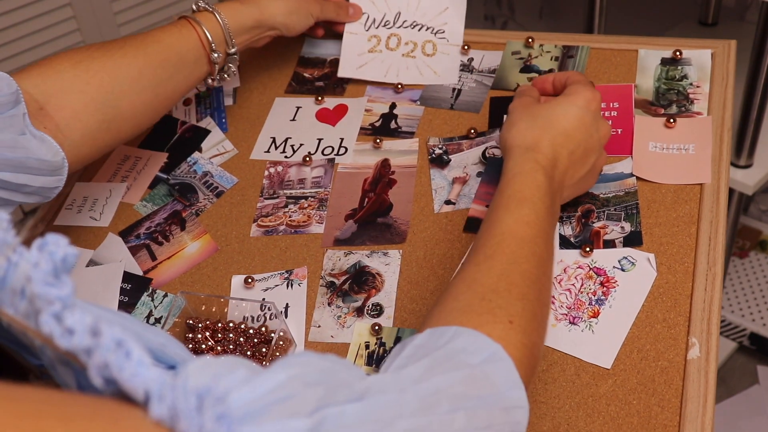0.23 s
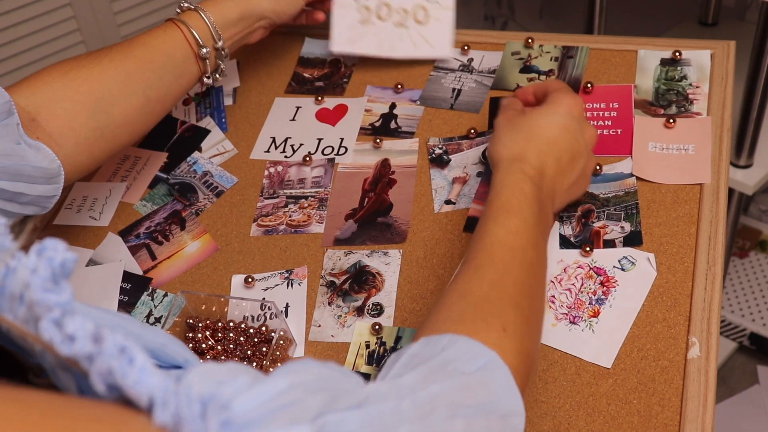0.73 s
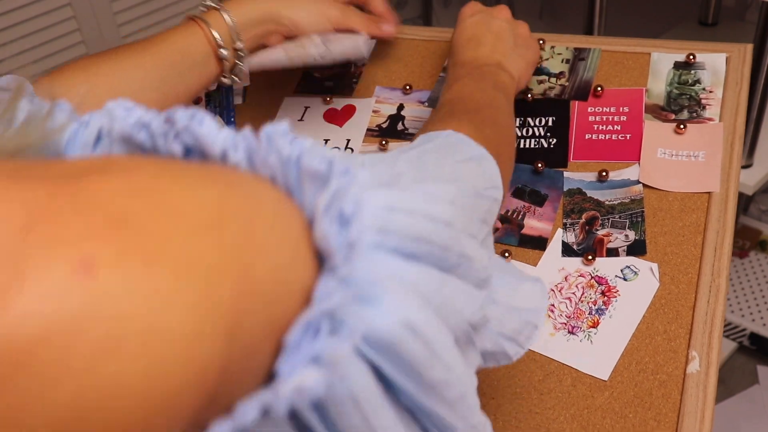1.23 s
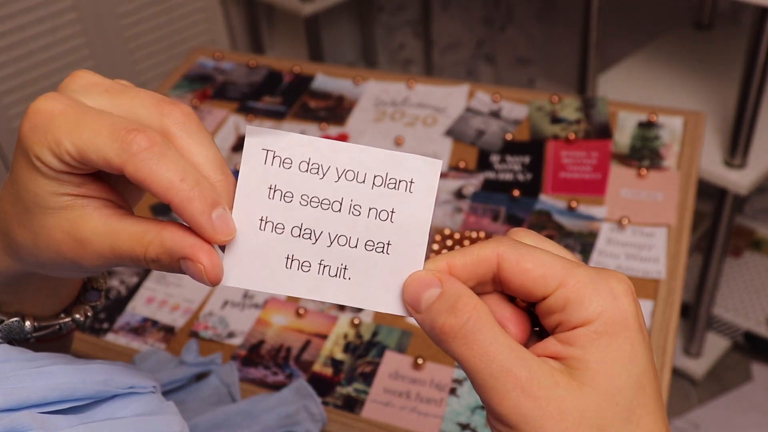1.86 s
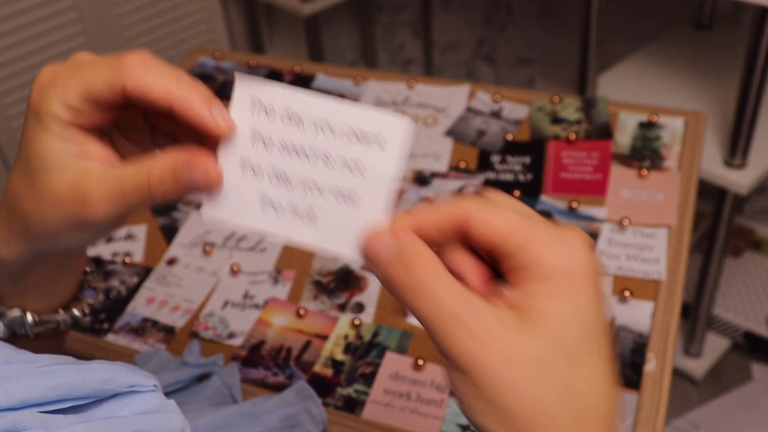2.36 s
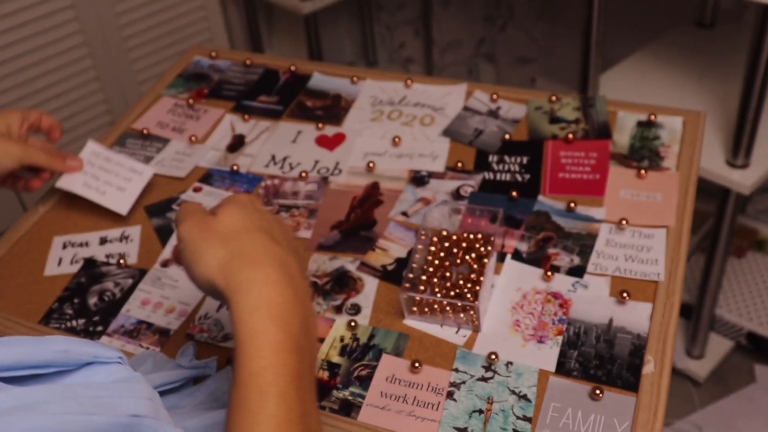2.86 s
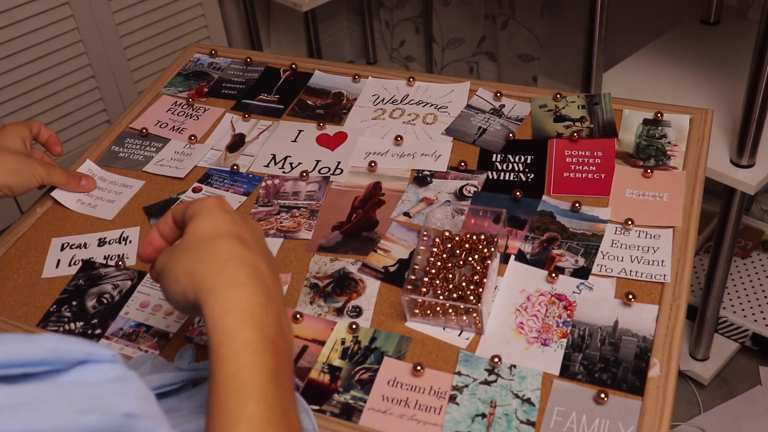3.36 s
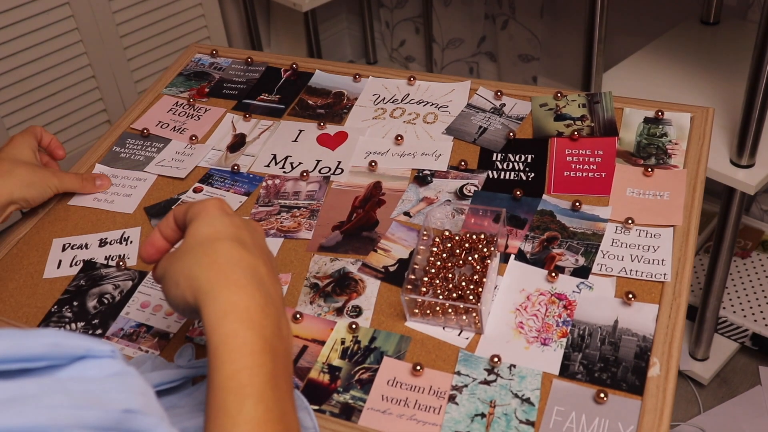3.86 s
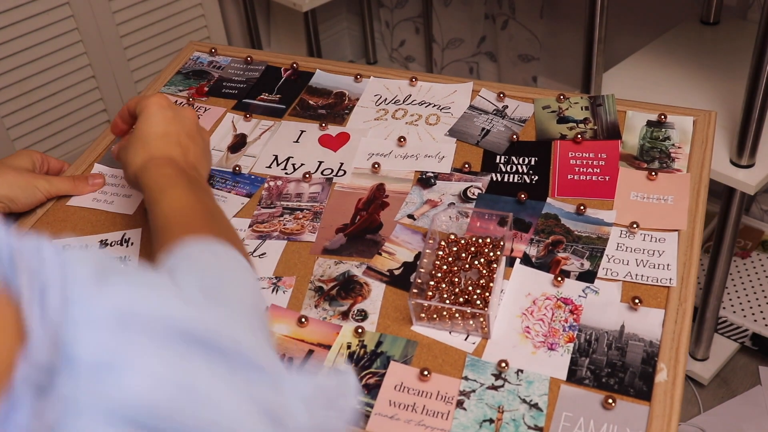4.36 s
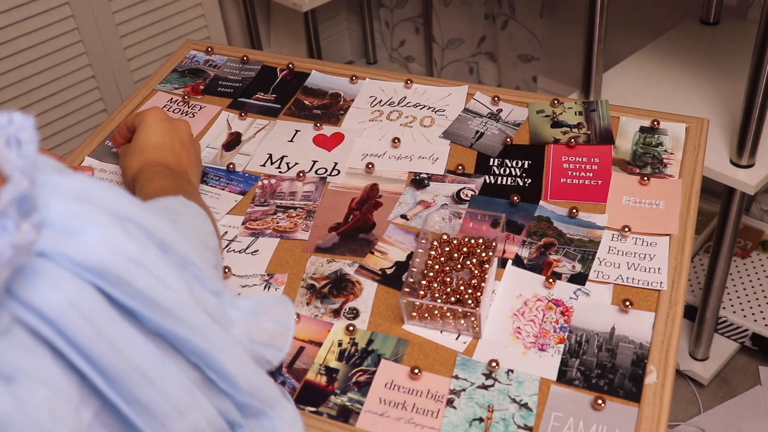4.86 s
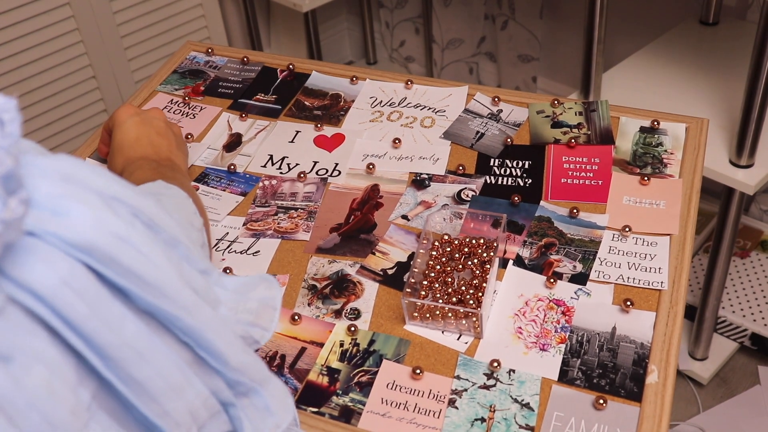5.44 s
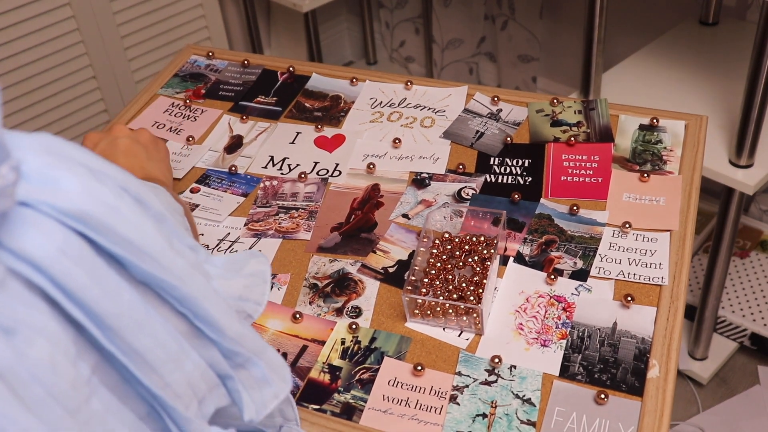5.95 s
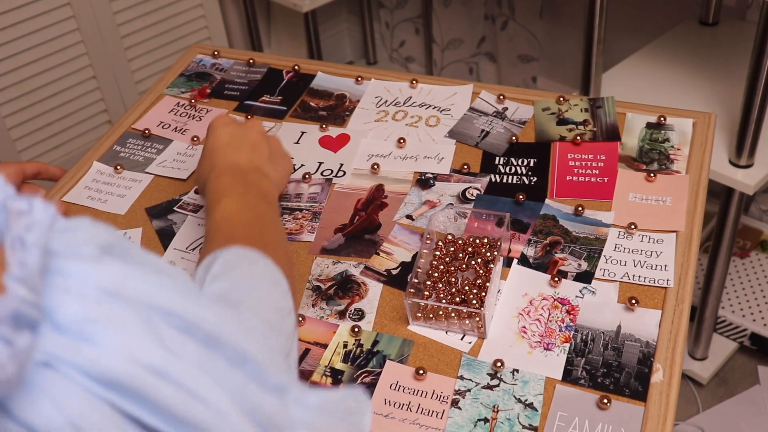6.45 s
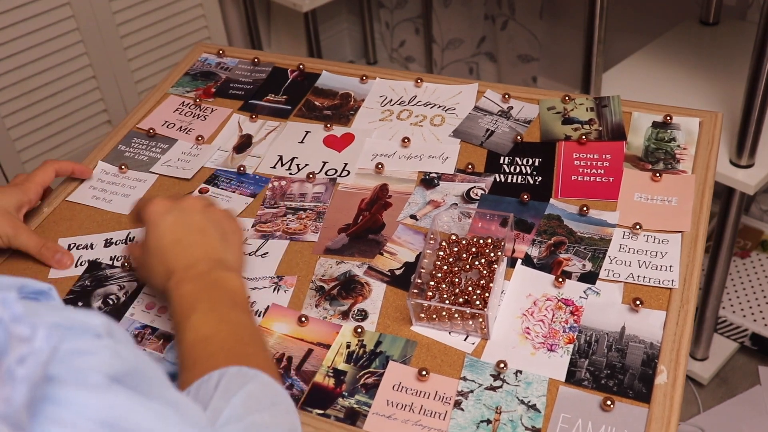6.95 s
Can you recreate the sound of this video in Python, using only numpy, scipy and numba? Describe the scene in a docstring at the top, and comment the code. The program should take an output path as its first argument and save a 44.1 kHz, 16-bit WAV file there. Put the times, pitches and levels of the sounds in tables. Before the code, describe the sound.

A hard card snap bursts out early over brushing paper and cloth, far louder than everything else. Smaller ticks and a papery swish follow, then a lull. Light fingertip taps, dry scuffs and muffled board rubs come in scattered groups, culminating in a dense cluster of woody knocks before fading. Close microphones, slightly off to one side of the hands, short soft room tail, faint hum and hiss.

```python
"""Paper cards snap and push pins tick on a cork board, on a table in a small quiet room.
Each snap is a sharp release and a run of slips ringing a card; fingertip knocks ring the board's modes.
Card edges scuff, paper and sleeves slide as band-passed friction noise, palms rub the board modes.
The hands work close to a stereo microphone pair, a little to its right. Behind them lie a diffuse room
tail, low room rumble, the pair's own hiss and a wavering appliance hum."""
import sys
import numpy as np
from scipy import signal
from scipy.fft import rfft, irfft, next_fast_len
from scipy.io import wavfile
from scipy.ndimage import uniform_filter1d
from numba import njit

SR = 44100
rng = np.random.default_rng(int(sys.argv[2]) if len(sys.argv) > 2 else 0)


def generate_wav(sig):
    """Save sig (samples, or channels by samples) to the path in sys.argv[1] as 16-bit PCM at SR."""
    pcm = np.round(np.clip(np.atleast_2d(sig).T, -1, 1) * 32767).astype(np.int16)
    wavfile.write(sys.argv[1], SR, pcm)


N = 317961  # length in samples


def undb(db):
    """Decibels to gain."""
    return 10 ** (np.asarray(db) / 20)


def unit(x):
    """Scale to rms 1."""
    return x / np.sqrt(np.mean(x ** 2))


@njit
def svf(x, hz, q):
    """State-variable band-pass whose centre may move every sample."""
    y = np.empty(len(x))
    band_state, low_state, damping = 0., 0., 1 / q
    for i in range(len(x)):
        g = np.tan(np.pi * hz[i] / SR)
        v = (band_state + g * (x[i] - low_state)) / (1 + g * (g + damping))
        band_state = 2 * v - band_state
        low_state = low_state + 2 * g * v
        y[i] = damping * v
    return y


def band(x, hz, q):
    """Band-pass at a fixed or moving centre."""
    return svf(x, np.clip(hz, 20, .4 * SR) * np.ones(len(x)), max(q, .2))


def walk(rate):
    """Random levels joined by straight slopes, a new one every 1 / rate s; spread near 1."""
    hold = int(SR / rate)
    steps = np.repeat(rng.standard_normal(N // hold + 1), hold)
    return uniform_filter1d(steps, hold)[:N]


def grains(spread_db):
    """Friction noise: dense micro-slips of uneven but bounded size."""
    size_db = spread_db * np.minimum(rng.exponential(size=N), 5)
    return unit(rng.standard_normal(N) * undb(size_db))


def add(out, s, sound):
    """Mix a short sound in at time s."""
    i = int(s * SR)
    out[..., i:i + sound.shape[-1]] += sound[..., :N - i]


# spectrum of the room and capsule noise: (frequency [Hz], relative density [dB per Hz])
AIR_SPECTRUM = [(20, 3), (45, 0), (120, 0.5), (220, 0.5), (400, -3.5), (800, -9), (1600, -11.5),
                (3200, -15), (8000, -20), (11000, -26), (16000, -27)]
# how alike the two capsules hear that noise: (frequency [Hz], left-right correlation [0 to 1])
CAPSULE_LIKENESS = [(60, 0.25), (300, 0.24), (700, 0.063), (1500, 0.011), (16000, 0.009)]
AIR_DB = -55  # rms of the part common to both sides


def air():
    """Room rumble, partly shared by both capsules, under their nearly unrelated hiss."""
    size = next_fast_len(N)
    log_hz = np.log(np.arange(size // 2 + 1) * SR / size + 1)
    air_hz, density_db = np.transpose(AIR_SPECTRUM)
    alike_hz, correlation = np.transpose(CAPSULE_LIKENESS)
    gain = undb(np.interp(log_hz, np.log(air_hz), density_db))
    alike = np.clip(np.interp(log_hz, np.log(alike_hz), correlation), 0, 1)

    def shaped(share):
        return irfft(rfft(rng.standard_normal(size)) * gain * np.sqrt(share), size)[:N]

    mid = shaped(1 + alike)
    side = shaped(1 - alike)
    return np.array([mid + side, mid - side]) * undb(AIR_DB) / np.std(mid)


# appliance hum, pitch and level being the centres of its wavering:
# (start [s], end [s], frequency [Hz], rms level [dB])
HUM_SPANS = [(0.02, 1.5, 146, -61.5), (1.202, 6.7, 130, -69)]


def hum():
    """Each tone wavers slightly in pitch and level, the same in both capsules."""
    out, t = np.zeros(N), np.arange(N) / SR
    for start, end, hz, db in HUM_SPANS:
        phase = 2 * np.pi * np.cumsum(hz * (1 + 0.012 * walk(13))) / SR
        on = uniform_filter1d(1. * ((t >= start) & (t <= end)), 1024)
        out += on * np.sqrt(2) * undb(db + 2 * walk(8.2)) * np.sin(phase)
    return out


ROOM_T60_S, ROOM_TREBLE_T60_S, ROOM_DB = 0.26, 0.2, -3
ROOM_SHARED_HZ = 900  # below this the tail grows alike in both capsules


def room(x):
    """Walls return a diffuse tail; long waves reach both capsules alike, and the treble dies first."""
    t = np.arange(SR // 2) / SR
    noise = rng.standard_normal((2, len(t)))
    shared = signal.butter(1, ROOM_SHARED_HZ, fs=SR, output="sos")
    noise[1] += signal.sosfilt(shared, noise[0] - noise[1])
    low = signal.lfilter([.3], [1, -.7], noise)
    low_tail = low * np.exp(-np.log(1000) * t / ROOM_T60_S)
    treble_tail = (noise - low) * np.exp(-np.log(1000) * t / ROOM_TREBLE_T60_S)
    # gradual build-up: the first walls are a few metres off
    tail = (low_tail + treble_tail) * (1 - np.exp(-t / .006))
    tail = tail / np.sqrt(np.sum(tail ** 2) / 2)
    return undb(ROOM_DB) * signal.fftconvolve(x[None], tail)[:, :N]


def strokes(rows):
    """Gain over time of overlapping strokes, and each further column averaged by stroke power."""
    peak_s, rise, fall, db, *more = np.array(rows, float).T[:, :, None]
    t = np.arange(0, N + 64, 64) / SR
    rising = (peak_s - t) / np.maximum(rise, .01)
    falling = (t - peak_s) / np.maximum(fall, .01)
    drop_db = 20 * np.where(t < peak_s, rising, falling)
    power = undb(2 * (db - drop_db)) + 1e-18
    total = power.sum(axis=0)

    def every_sample(v):
        return np.interp(np.arange(N) / SR, t, v)

    averages = [every_sample((power * column).sum(axis=0) / total) for column in more]
    return [every_sample(np.sqrt(total))] + averages


SLIDE_MIX_DB = -4.0  # added to the levels of paper, sleeve and palm strokes

# modes of the cork board, before pitch jitter and the push or rub that drives them:
# (frequency [Hz], relative level [dB], t60 [s])
BOARD_MODES = [(116, -12.5, 0.025), (150, -7.5, 0.061), (206.5, -3.5, 0.046), (239.3, -3.5, 0.052),
               (311, -8, 0.065), (410, -2.5, 0.069), (494, -2.5, 0.052), (694, 4.5, 0.018),
               (852, -8.5, 0.033)]


def board_ring(hz_jitter):
    """Response of the board to a sharp blow; sign and slight detuning of each mode vary by blow."""
    t = np.arange(8192) / SR
    ring = np.zeros(len(t))
    for hz, db, t60 in BOARD_MODES:
        side, detune = rng.standard_normal(2)
        decay = np.exp(-np.log(1000) * t / t60)
        tone = np.sin(2 * np.pi * hz * (1 + hz_jitter * detune) * t)
        ring += np.sign(side) * undb(db) * decay * tone
    return ring


# palm rubbing, heard through the board; rise and fall are the times to gain or lose 20 dB:
# (peak time [s], rise [s], fall [s], level before SLIDE_MIX_DB [dB])
PALM_STROKES = [(0, .05, .02, -33.5), (.096, 0.068, .17, -52.5), (.504, 0.037, 0.046, -44.5),
                (.718, 0.16, 0.049, -48), (.832, 0.032, 0.046, -55), (1.046, .08, 0.049, -45),
                (1.126, 0.1, .1, -47), (2.22, 0.083, 0.43, -52), (2.58, 0.16, 0.036, -46.5),
                (2.7, .1, 0.34, -55), (3.03, 0.064, 0.24, -55), (3.3, .4, 0.046, -59),
                (3.74, 0.39, .3, -52), (4.06, 0.25, 0.43, -53), (4.54, 0.11, 0.1, -46.5),
                (4.65, .05, 0.15, -47), (4.82, 0.11, 0.17, -55), (5.31, .06, .09, -50),
                (5.68, 0.26, 0.053, -57), (5.92, 0.13, .3, -48), (6.03, 0.13, 0.14, -37),
                (6.89, 0.2, 0.23, -55)]


def palm():
    """Uneven friction of the palm drives the board modes."""
    gain, = strokes(PALM_STROKES)
    rub = unit(signal.fftconvolve(grains(2.2), board_ring(0.027))[:N])
    return rub * gain * undb(2.2 * walk(25) + SLIDE_MIX_DB)


# sleeve brushing the board; rise and fall are the times to gain or lose 20 dB:
# (peak time [s], rise [s], fall [s], level before SLIDE_MIX_DB [dB], centre frequency [Hz])
SLEEVE_STROKES = [(0, 0.054, 0.38, -45.5, 2300), (.096, 0.36, 0.16, -48, 3200),
                  (.33, 0.066, 0.062, -52.5, 2500), (.504, 0.026, 0.037, -34.5, 1660),
                  (.73, .07, 0.32, -44, 2000), (.916, 0.44, 0.089, -55.5, 2620),
                  (1.06, 0.089, .15, -44.5, 1640), (1.194, 0.39, 1, -55, 1170), (2.37, .06, 1, -53.5, 1320),
                  (2.49, 0.14, 0.19, -55, 2280), (2.77, .5, 0.41, -57, 1550),
                  (3.03, 0.043, 0.21, -54.5, 1700), (3.23, 0.048, 0.17, -54, 2730),
                  (3.52, 0.075, 0.24, -43.5, 805), (3.7, 0.34, 0.039, -49.5, 790),
                  (3.81, 0.14, 0.17, -52.5, 2020), (3.95, 0.086, 0.3, -49.5, 784), (4.2, 0.4, .3, -58, 930),
                  (4.4, 0.34, 0.36, -42.5, 1800), (4.58, 0.19, 0.089, -48, 890),
                  (4.75, 0.17, 0.099, -56.5, 1900), (4.95, .3, 0.16, -52.5, 1700),
                  (5.31, 0.24, .11, -56, 905), (5.68, 0.34, .5, -56, 1000), (5.81, 0.15, 0.19, -49, 1160),
                  (6.03, 0.18, 0.11, -37.5, 1300), (6.28, .5, 0.38, -54.5, 1530),
                  (6.65, .05, 0.42, -49, 1760), (6.75, 0.32, 0.12, -53.5, 2040),
                  (6.89, .16, 0.23, -55, 1560)]


def sleeve():
    """Cloth catches and slips unevenly, a rustle in a moving band."""
    gain, hz = strokes(SLEEVE_STROKES)
    rustle = unit(band(band(grains(2.3), hz, 0.82), hz, 0.38))
    return rustle * gain * undb(3.0 * walk(30) + SLIDE_MIX_DB)


# paper sliding on paper; rise and fall are the times to gain or lose 20 dB:
# (peak time [s], rise [s], fall [s], level before SLIDE_MIX_DB [dB], centre frequency [Hz])
PAPER_STROKES = [(0, .05, .07, -43.5, 4370), (.096, 0.21, 0.23, -46, 6300), (.33, 0.24, .25, -59, 6000),
                 (.456, 0.058, .15, -56, 6500), (.686, 0.18, 0.033, -44.5, 5540),
                 (.916, 0.27, 0.15, -49, 7100), (1.055, 0.17, 0.13, -36.5, 6500),
                 (2.31, .13, 0.46, -59, 4800), (2.49, 0.11, .5, -53.5, 4700), (2.77, 0.33, 0.16, -54, 5760),
                 (3.03, 0.026, 0.96, -55.5, 5370), (3.3, 0.16, 0.26, -50, 4560),
                 (3.39, 0.28, 0.056, -53.5, 6700), (3.5, 0.07, .18, -45.5, 6500),
                 (3.74, 0.12, 0.11, -50, 7040), (3.86, 0.18, .05, -52, 6300), (4.2, 0.34, 1, -60, 6060),
                 (4.38, 0.25, 0.12, -58, 4440), (4.54, 0.099, 0.14, -51, 4320),
                 (4.7, 0.23, 0.16, -53, 5530), (5.5, 0.12, .11, -64, 4800), (5.8, 0.21, .5, -55.5, 4800),
                 (5.97, 0.19, 0.2, -45, 4640), (6.14, .3, 0.3, -57.5, 4760), (6.62, 0.045, .8, -62.5, 5700),
                 (6.92, 0.09, 0.29, -54, 4900)]


def paper():
    """Paper catches and slips unevenly, a hiss in a moving band."""
    gain, hz = strokes(PAPER_STROKES)
    hiss = unit(band(band(grains(3.4), hz, 0.75), hz, 0.35))
    return hiss * gain * undb(1.9 * walk(40) + SLIDE_MIX_DB)


# short drags of a card edge:
# (time [s], length [s], rms level at the start [dB], centre frequency [Hz], level change over the drag [dB])
EDGE_DRAGS = [(0.488, 0.031, -46, 6300, 3), (0.707, 0.044, -50, 8950, 5), (0.838, 0.055, -44.5, 7140, 1.5),
              (1.299, 0.042, -55, 4040, -4), (3.234, 0.14, -52.5, 9100, -19), (3.466, 0.061, -54, 9300, -4),
              (3.692, 0.045, -46, 9100, -10), (3.801, 0.032, -47.5, 8260, -3),
              (4.627, 0.039, -49, 9250, -4), (4.719, 0.063, -55, 4160, -5), (5.429, 0.077, -48, 4500, -18),
              (5.779, 0.03, -46.5, 5140, -7), (5.874, 0.065, -38, 5260, -7.5), (5.962, 0.051, -45, 4600, 0),
              (6.873, 0.027, -54, 10000, -11)]


def scuffs():
    """A card edge catches, drags with a hiss and lets go."""
    out, friction = np.zeros(N), grains(5.9)
    for s, length, db, hz, change_db in EDGE_DRAGS:
        t = np.arange(int(max(length, .01) * SR)) / SR
        grit = friction[int(s * SR):][:len(t)]
        hiss = unit(band(band(grit, hz, 1.0), hz, 0.42))
        edges = np.minimum(1, t / 0.0076) * np.minimum(1, (t[-1] - t) / 0.008)
        add(out, s, edges * undb(db + change_db * t / t[-1]) * hiss)
    return out


# finger knocks on the board: (time [s], peak level [dB], push length [ms])
FINGER_KNOCKS = [(0.562, -33.5, 2.5), (1.106, -34, 1.74), (1.252, -38.5, 2.9), (2.273, -34, 2),
                 (2.485, -42.5, 1.4), (2.583, -34.5, 2.1), (3.035, -36.5, 7.1), (3.184, -44, 5.5),
                 (3.551, -55, 1.8), (3.691, -33.5, 4.7), (4.364, -35, 4.9), (4.504, -39.5, 2),
                 (4.565, -37, 2.8), (5.435, -36, 2.8), (5.783, -31.5, 3.1), (5.873, -23, 3.5),
                 (5.89, -30, 3.6), (5.981, -29, 4.4), (6.021, -30, 2.9), (6.049, -25, 4.2),
                 (6.884, -46, 2.3)]


def knocks():
    """A soft fingertip pushes longer, so it wakes only the low modes of the board."""
    out = np.zeros(N)
    for s, db, ms in FINGER_KNOCKS:
        push = np.hanning(int(max(ms, .2) * SR / 1000) + 2)
        sound = np.diff(np.convolve(board_ring(0.041), push))  # the air hears the speed of the surface
        add(out, s, undb(db) * sound / np.abs(sound).max())
    return out


# card snaps, pin ticks and fingertip taps; the level is the peak of the body, before panning and treble:
# (time [s], level [dB], centre frequency [Hz], sharpness [Q], treble relative to body [dB],
#  contact decay time [ms], left minus right [dB])
CARD_SNAPS = [(0.5699, -0.5, 1940, 1.4, -2.5, 0.76, -1.5), (0.4875, -29, 3000, 0.74, -7, .7, -2),
              (0.747, -22.5, 2020, 2.4, -12, 4, -2), (1.111, -15, 1075, 1.4, -30, 6.9, 1.5),
              (1.118, -20.5, 1310, 1.9, -25, 3.3, -5), (2.229, -33.5, 3000, 2.3, -22, 0.89, 0),
              (2.240, -35, 2430, 1.1, -30, 2.5, 0), (2.277, -35, 3360, 1, -33, 3.8, 21),
              (2.2829, -22.5, 1950, 0.61, -28, 2.1, -5.5), (2.493, -30, 3120, 1, -20, 2.2, 7),
              (2.562, -30.5, 1410, 1.1, -29, 2.6, 2), (2.594, -31.5, 915, 1.5, -9.5, 4.6, 12.5),
              (2.632, -43.5, 1200, 0.69, 3, 5.4, 9), (3.540, -27, 720, 3.2, -12, 3.9, 1),
              (3.553, -39, 400, 9.5, -30, 7.9, 4), (3.660, -39.5, 674, 4.2, -25, 15, 1),
              (3.6945, -39, 600, 1.1, 13, .5, 2), (3.729, -46, 500, 1.4, -6, 2.3, -1),
              (3.818, -20, 6030, 0.75, -16, 0.57, 4), (3.990, -38, 774, 6.5, -12, 23, 0),
              (4.020, -45, 800, 2.4, -28, 8.9, 2), (4.172, -42, 760, 2.1, -23, 13, -3),
              (4.505, -37, 610, 1.6, -28, 8.7, 2), (4.643, -42, 497, .9, 4, 2.6, 2),
              (5.432, -34.5, 1130, 1.05, -9, 11, 1), (5.572, -47, 1260, 4.2, -20, 2.7, -3),
              (5.670, -36, 980, 3.1, -24, 3.9, 0), (5.785, -31, 1410, 2.2, -4.5, 2, -1),
              (5.875, -18.5, 1240, 0.99, -28, 3.6, 1), (5.89, -18.5, 1030, 0.84, -20, 2.8, 0),
              (5.987, -27.5, 1300, 0.76, -8, 2.3, 0), (6.003, -38, 1500, .9, -25, 2, 0),
              (6.028, -34, 1200, 1.5, -27, 3.2, 4), (6.047, -29, 1300, 1.1, -25, 2, 0),
              (6.079, -27.5, 1810, 0.5, -34, 2.9, -2), (6.102, -30, 1200, .9, -27, 1.7, 0)]


def snaps():
    """A sharp release and a run of slips ring two broad bending modes of the card and a bright edge."""
    out, t = np.zeros((2, N)), np.arange(4096) / SR
    for s, db, hz, q, treble_db, ms, pan_db in CARD_SNAPS:
        tau = max(ms, .05) / 1000
        envelope = (1 - np.exp(-t / (0.2 * tau))) * np.exp(-t / tau)
        slips = rng.choice([-1., 1.], len(t)) * envelope
        burst = min(0.41 * ms, 1) * slips  # brief contacts slip less
        burst[0] = 1  # the release
        modes = band(burst, hz, q) + undb(-18.5) * band(burst, 1.76 * hz, 1.7)
        body = band(modes, hz, 0.37)
        bright = band(burst, 7200.0, 4.1) + undb(-12) * band(burst, 11560.0, 1.4)
        edge = band(bright, 9500.0, 0.55)
        sound = body / np.abs(body).max() + undb(treble_db) * edge / np.abs(edge).max()
        side_db = np.array([[pan_db], [-pan_db]]) / 2
        add(out, s, undb(db + side_db) * sound)
    return out


# how late the left capsule hears the hands: (time [s], delay [samples])
LEFT_DELAY = [(0, 1), (1.4, 1), (2, 3), (7.21, 3)]
# sound sent to the walls, less when the hands are near the pair: (time [s], level before ROOM_DB [dB])
WALL_SEND = [(0, 0), (1.4, -.5), (2.1, -1.5), (2.7, -2), (3.1, 1.5), (5.2, -1), (5.8, -0.5), (7.21, 0)]


def scene():
    """The hands work to the right of the pair, the hissing card edges and paper straight ahead."""
    left, right = snaps() + knocks() + sleeve() + palm()
    cards = scuffs() + paper()
    i = np.arange(N)
    delay = np.interp(i / SR, *np.transpose(LEFT_DELAY))
    late_left = np.interp(i - delay, i, left)
    direct = np.array([late_left, right]) + cards
    send = undb(np.interp(i / SR, *np.transpose(WALL_SEND)))
    walls = room(send * ((left + right) / 2 + cards))
    return direct + walls + air() + hum()


MIC_LOW_HZ, TOP_HZ = 45.6, 15800
CEILING = .92  # level that the rounded peaks approach, full scale = 1


def record(dry):
    """The recorder rolls off the deep bass, rounds the loudest peaks and cuts the top."""
    thin = signal.sosfilt(signal.butter(2, MIC_LOW_HZ, "highpass", fs=SR, output="sos"), dry)
    rounded = CEILING * np.tanh(thin / CEILING)
    return signal.sosfilt(signal.ellip(10, .2, 80, TOP_HZ, fs=SR, output="sos"), rounded)


dry = scene()
out = record(dry)
generate_wav(out)
```